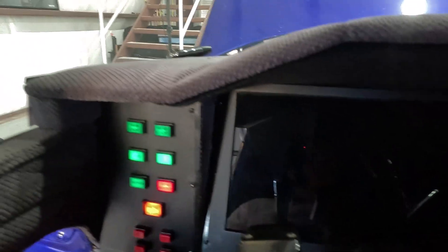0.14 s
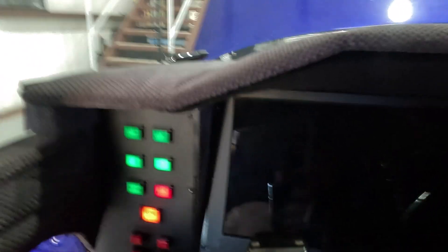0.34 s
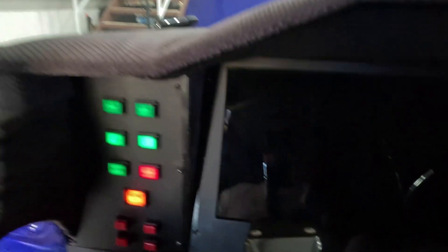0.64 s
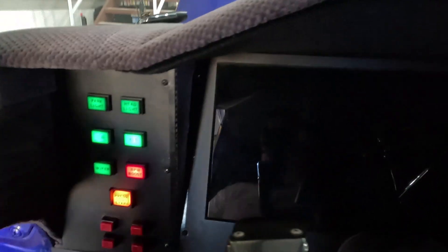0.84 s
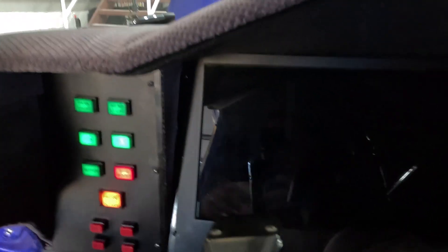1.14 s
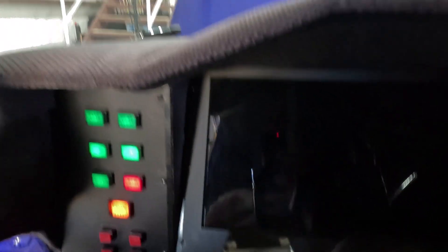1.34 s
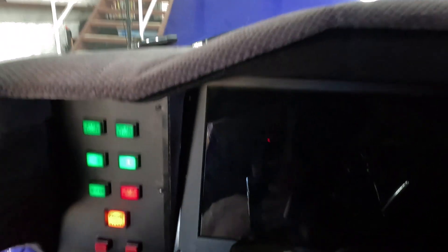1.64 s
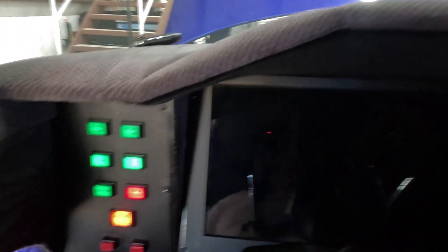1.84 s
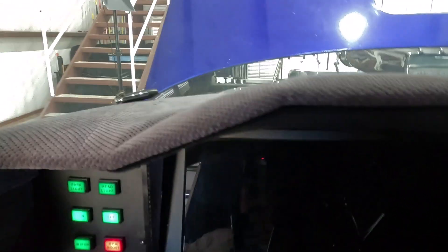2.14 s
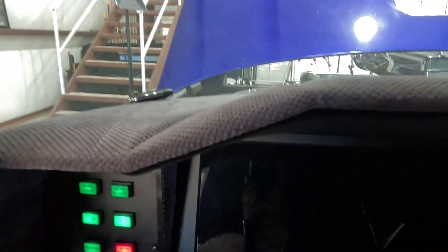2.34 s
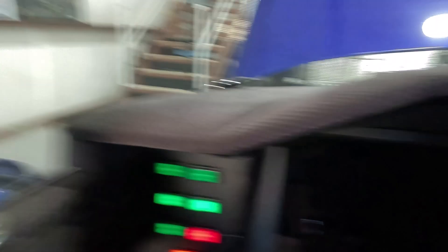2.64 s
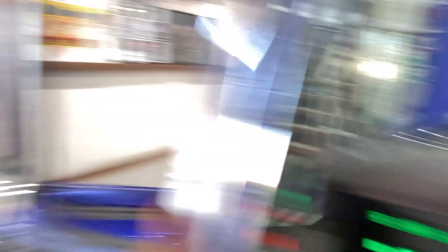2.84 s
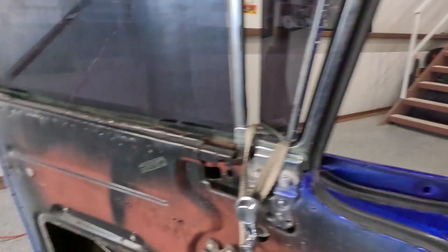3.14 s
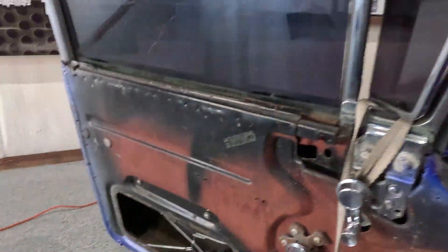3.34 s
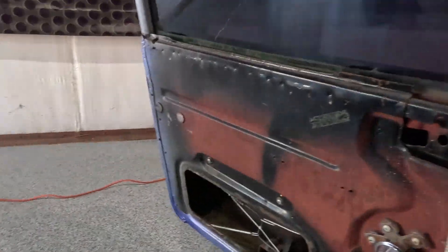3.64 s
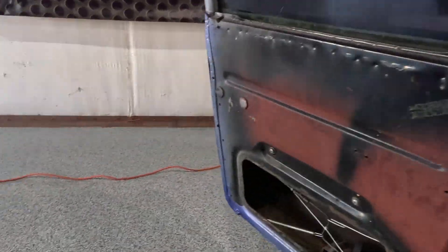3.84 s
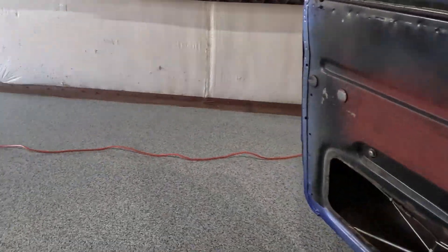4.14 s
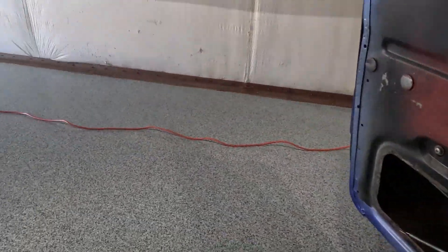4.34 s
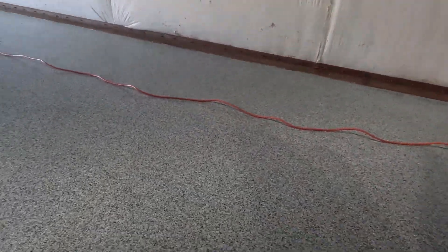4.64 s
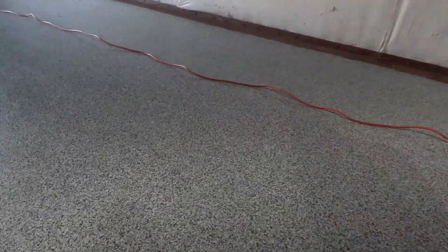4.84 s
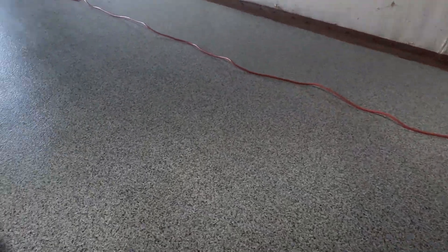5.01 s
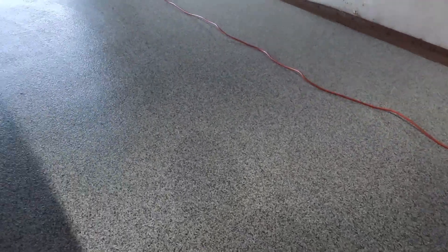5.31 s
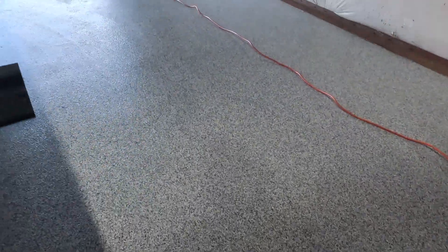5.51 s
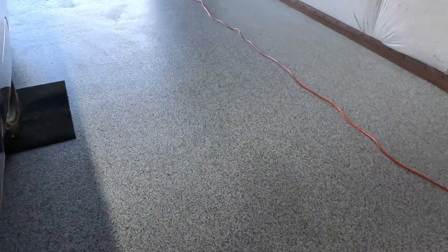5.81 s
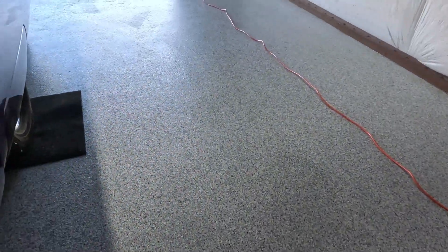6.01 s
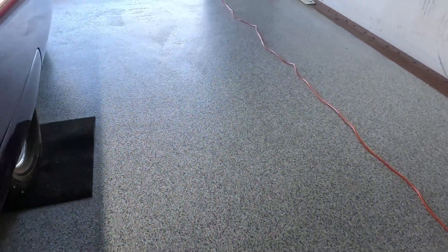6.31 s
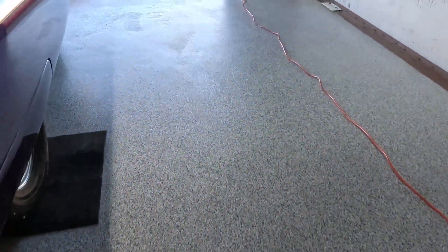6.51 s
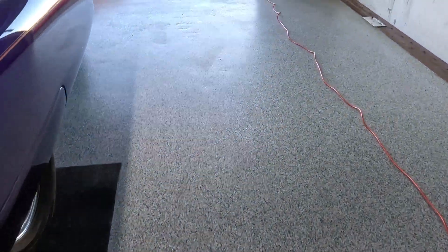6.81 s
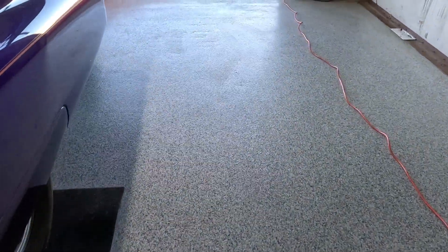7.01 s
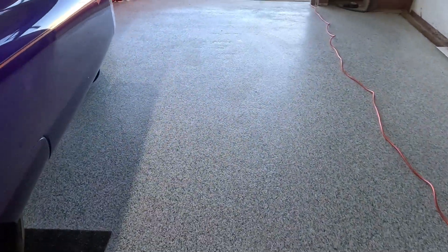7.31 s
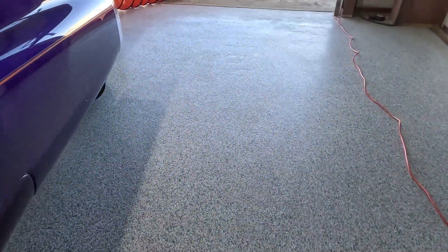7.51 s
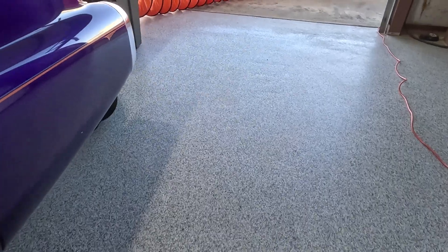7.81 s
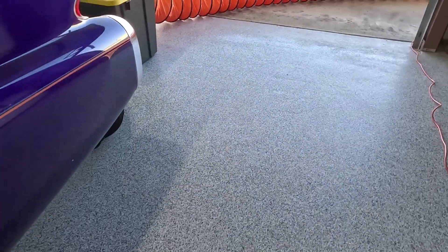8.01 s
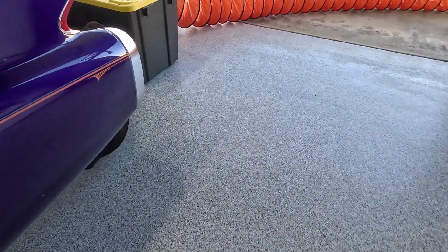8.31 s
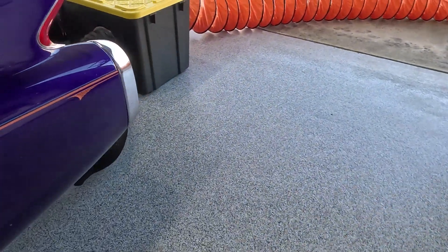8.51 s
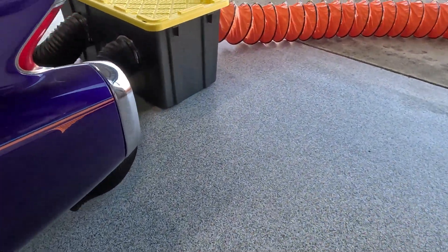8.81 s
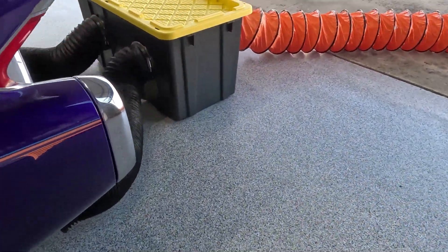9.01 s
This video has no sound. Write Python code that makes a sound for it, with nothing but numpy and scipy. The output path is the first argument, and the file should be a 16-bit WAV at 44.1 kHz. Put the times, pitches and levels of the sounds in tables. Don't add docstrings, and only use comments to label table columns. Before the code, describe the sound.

A stereo microphone sits inside an old car whose eight-cylinder engine idles in a hard-floored shop: low humming exhaust, soft rumble, muted engine hiss to the left. Near three seconds it leaves past the door; hiss and fine valve ticking brighten. Walking along the flank, the drone dips and swells in standing waves, then becomes fuller and more tonal at the tail.

```python
import sys
import numpy as np
from scipy import signal
from scipy.io import wavfile
from scipy.ndimage import uniform_filter1d

SR = 44100
rng = np.random.default_rng(int(sys.argv[2]) if len(sys.argv) > 2 else 0)


def persist_wave(psi):
    counts = np.round(np.clip(psi, -1, 1) * 32767).astype(np.int16)
    wavfile.write(sys.argv[1], SR, np.atleast_2d(counts).T)


def gain_from_db(level_db):
    decades = np.asarray(level_db, float) / 20
    return 10 ** decades


N = 403515
TIME = np.arange(N) / SR

# time_s, four_stroke_cycle_hz
ENGINE_SPEED = [(0.0, 8.427), (0.93, 8.425), (1.61, 8.547), (2.03, 8.464), (3.0, 8.635), (3.34, 8.493),
                (4.33, 8.614), (4.57, 8.488), (4.77, 8.544), (5.4, 8.567), (5.67, 8.486), (5.89, 8.565),
                (6.62, 8.509), (7.48, 8.287), (7.73, 8.236), (8.43, 8.2), (9.15, 8.221)]
# strength_db, lag_in_pipes_crank_degrees
FIRINGS = [(8.9, 44.0), (-10.1, 84.5), (8.8, 39.8), (9.1, 124.1), (8.0, 117.8), (7.7, 51.2), (-2.4, 70.8),
           (11.3, 76.7)]
# time_s, near_gain, near_delay_ms, far_gain, far_delay_ms
WALL_ECHOES = [
    (2.6, 1.0, 9.87, 1.01, 19.73),
    (3.2, 1.08, 9.96, 0.92, 19.82),
    (5.0, 0.96, 10.05, 0.83, 19.88),
    (6.0, 0.78, 10.55, 0.23, 20.35),
    (6.8, 0.73, 11.46, 0.24, 17.28),
    (7.3, 1.1, 12.11, 0.87, 16.98),
    (8.1, 1.0, 12.81, 0.75, 17.75),
    (8.4, 0.99, 12.71, 0.27, 16.78),
    (9.0, 0.96, 12.66, 0.0, 23.26),
]
# time_s, place (0 seat, 1 door, 2 flank, 3 tail)
PLACES = [
    (2.75, 0),
    (3.15, 1),
    (4.4, 0.87),
    (5.4, 2.13),
    (6.3, 2),
    (7.1, 2.5),
    (7.6, 2.5),
    (8.3, 3),
]
# frequency_hz, density_db_per_hz
HISS_IN_SEAT = [(350, -31), (600, -5), (810, -14.5), (1030, -6), (1400, -11), (1760, -13), (2130, -13),
                (4150, -17), (4440, -17.5), (7660, -24), (9500, -30), (10900, -38.5), (12300, -34),
                (15600, -49)]
# frequency_hz, density_db_per_hz
HISS_OUTSIDE = [(350, -28.5), (600, -2), (720, -5.5), (867, -7), (1180, -6), (1670, -10), (1780, -12.5),
                (1940, -10), (2250, -11.5), (2540, -11), (6000, -16.5), (8900, -24), (12300, -37.5),
                (15600, -50.5)]
# frequency_hz, density_db_per_hz
BARK_SPECTRUM = [(200, -40), (280, -7.5), (320, -6), (420, -4), (470, -7), (510, -2.5), (545, -12),
                 (600, -11.5), (625, -8.5), (650, -15.5), (900, -23.5), (1200, -50.5), (2000, -100)]
# frequency_hz, density_db_per_hz
RUMBLE_SPECTRUM = [(15, -22.5), (28, -10), (55, -6.5), (100, -2.5), (128, -4.5), (155, -13.5), (220, -14.5),
                   (280, -16.5), (340, -39)]
# time_s, level_db
RUMBLE_LEVEL = [(0, -39), (2.7, -38), (3.5, -41), (6, -42), (9.15, -41.5)]
# pitch_hz, width_hz, level_db
RINGING_PANELS = [(1007, 44, 8.5), (927, 37, 3.5), (1638, 67, 5), (1870, 50, 2.5), (2080, 43, 3.5),
                  (2195, 23, 3.5), (2590, 60, 3.5), (3480, 50, 3), (4030, 40, 4.5), (4200, 60, 3.5),
                  (7500, 300, 3), (5790, 25, 6), (8750, 88, 3.5)]
# frequency_hz, correlation (0 to 1)
SIDE_LIKENESS = [(60, 1.0), (130, 0.95), (290, 0.97), (640, 0.89), (1410, 0.74), (3100, 0.52), (6820, 0.58),
                 (15000, 0.38)]
# multiple_of_cycle, seat_db, door_db, flank_db, tail_db (rms)
UPPER_TONES = [(33.05, -55, -59.5, -57.5, -56.5), (34, -63, -62, -67.5, -45.5),
               (35.2, -61, -57, -57, -58.5), (36.1, -77.5, -54.5, -66, -50.5),
               (38.06, -72.5, -58.5, -60, -60.5), (38.46, -69.5, -71, -61.5, -60.5),
               (39.86, -70.5, -66, -66, -54.5), (42.4, -70.5, -69.5, -54, -73.5),
               (42.94, -76.5, -81, -60, -58.5), (44, -61.5, -61, -57, -62.5), (45.8, -66.5, -64, -62, -61),
               (46.8, -72, -71.5, -66.5, -56), (49.9, -77.5, -70, -79.5, -58.5),
               (51.14, -61, -62, -65, -62), (52.4, -73, -74.5, -72.5, -57),
               (59.96, -79.5, -61.5, -63.5, -72.5), (63.15, -80.5, -75.5, -80, -58),
               (64.14, -75, -74, -73, -63), (49, -69, -69.5, -67, -63), (59, -70, -77.5, -78, -66),
               (65, -85, -82, -68, -67.5), (66.03, -77, -69, -70, -74.5)]
# pitch_hz, level_db, t60_s
STRUCK_CASTINGS = [(1035, -5, .07), (1899, -6, 0.042), (2158, -8.5, 0.039), (2920, -8.5, .04),
                   (3230, -9.5, 0.036), (3460, -8, .04), (4020, -7.5, 0.061), (4730, -9.5, .04),
                   (5290, -8, 0.046), (5800, -9, .04), (6050, -9, 0.033), (7360, -11.5, 0.035),
                   (7800, -14, .03), (8650, -15.5, 0.027), (9500, -15, 0.028), (11200, -24.5, .015),
                   (13200, -30, .012)]
# multiple_of_cycle, crest_db, tilt_db_per_m, node_m, node_spacing_m
STANDING_TONES = [(3, -52.5, 3, 0.5, 2.09), (4, -33, 2, -0.34, 7.0), (5, -51.5, 2, 2, 3.98),
                  (6, -51.5, 0, 1.5, 1.59), (7, -51.5, 4, 1.7, 1.2), (8, -22, -3.5, 2, 2.08),
                  (9, -36, 3.5, 0.76, 6.91), (10, -46.5, 5.5, 1.4, 5.5), (11, -30, 3, 4, 3.6),
                  (12, -41, -2.5, 0.62, 2.07), (13, -16.5, -3, 0.11, 2.74),
                  (14, -37.5, -2.6, 0.1, 2.75), (15, -27.5, 1.95, 1.03, 1.36),
                  (16, -41, 3.94, 4.5, 7.0), (17, -49, 2.5, 0.5, 2.0),
                  (18, -42.5, -1, 2.76, 2.2), (19, -42.5, 1.76, 2.06, 3.7),
                       (20, -37, -1.3, 2.03, 1.12), (21, -52, 5, 0.94, 1.55), (22, -55.5, 4, 2.84, 2.1),
                       (23, -46, 1.6, 0.15, 7.0), (24, -53, 4.0, 0.84, 1.27), (25, -47, 1, 0.14, 2.09),
                       (26, -42.54, -2.52, 1.95, 1.8), (27, -58.41, 8.0, 1.42, 2.27),
                       (28, -38, -1.55, 1.38, 2.58), (29, -53, 4.5, 1.31, 3.7),
                       (30, -53.5, 4.45, 4.34, 3.09), (31, -58.6, 8.0, 2.01, 1.07),
                       (32, -45.91, 0.5, 1.54, 0.88)]
SEAT_TONES_DB = [-42, -32, -48.3, -47.5, -48.5, -33.5, -43.0, -49.5, -31, -31.5, -21.6, -41, -29.5, -39,
                 -47.5, -52.5, -44, -38, -57, -59.5, -47, -52.5, -57.5, -63.6, -60.5, -43, -52.5, -55,
                 -52.2, -46]
BARK_BY_PLACE = [
    -49.5,
    -47,
    -45.5,
    -44.5,
]
# time_s, level_db
WHINE_LEVEL = [
    (0, -91.5),
    (2, -88.5),
    (6.5, -91),
    (7.2, -100),
]

LEAVE_S, WALK_M_PER_S = 2.75, 0.4485
RETURN, RETURN_PER_M = 0.25, 0.13
BAY_SEAT_DB, BAY_DOOR_DB, BAY_DB_PER_M, BAY_GAP_DB, BAY_GAP_M = -58, -52.5, -0.59, 2.5, 0.2
BAY_SHADE_DB, BAY_SHADE_M, BAY_SHADE_WIDTH_M = -2.0, 1.6, 0.22
PAN_SEAT_DB, PAN_DOOR_DB, PAN_TAIL_DB, TURN_M = 4.5, -0.6, 3, 1.3
BARK_SHADE_DB, BARK_SHADE_M, BARK_SHADE_WIDTH_M = -4, 1.85, 0.44
WHINE_HZ = 11880


def evened(x):
    return x / np.sqrt(np.mean(x ** 2) + 1e-20)


def read(points, hz):
    f, value = np.transpose(points)
    return np.interp(np.log(hz + 1), np.log(f + 1), value)


def curve(rows, t, column=1):
    return np.interp(t, np.array(rows)[:, 0], np.array(rows)[:, column])


def drift(t, rate_hz):
    steps = rng.standard_normal(256)
    return np.interp(t * rate_hz, np.arange(len(steps)), steps) * 1.22


def cycles():
    return np.cumsum(curve(ENGINE_SPEED, TIME)) / SR


def metres(t):
    return WALK_M_PER_S * np.maximum(t - LEAVE_S, 0)


def outside(t):
    return np.clip(curve(PLACES, t), 0, 1)


def by_place(levels_db, t):
    return np.interp(curve(PLACES, t), np.arange(len(levels_db)), levels_db)


def noise(magnitude_db, size, patchy_db, top_hz):
    hop = size // 4
    t = np.arange(N // hop + 5) * hop / SR
    hz = np.fft.rfftfreq(size, 1 / SR)
    above = np.sum(hz > top_hz)
    hz = hz[hz <= top_hz]
    a, b, c, d, patches = rng.standard_normal((len(t), len(hz), 5)).T
    patches = uniform_filter1d(patches, size=6, axis=0)
    patches = evened(uniform_filter1d(patches, size=12, axis=1))
    same = np.clip(read(SIDE_LIKENESS, hz), -1, 1)[:, None]
    left = a + 1j * b
    right = same * left + np.sqrt(1 - same ** 2) * (c + 1j * d)
    z = np.array([left, right]) * gain_from_db(magnitude_db(hz, t) + patchy_db * patches)
    z = np.pad(z, ((0, 0), (0, above), (0, 0)))
    return signal.istft(z, nperseg=size, noverlap=size - hop)[1][:, :N]


def whine():
    waver = 2.5 * drift(TIME, 20.1)
    level_db = curve(WHINE_LEVEL, TIME) + 4.0 * drift(TIME, 15.0)
    return gain_from_db(level_db) * np.sin(2 * np.pi * WHINE_HZ * TIME + waver)


def valves():
    turns, t, out = cycles(), np.arange(3000) / SR, np.zeros((2, N))
    for hz, db, t60 in STRUCK_CASTINGS:
        angles = rng.random(4)
        slack, luck = rng.standard_normal((2, 78, 4))
        tap_turns = np.arange(len(luck))[:, None] + angles + 0.006 * slack
        taps = np.zeros(N + 1)
        taps[np.searchsorted(turns, tap_turns)] = gain_from_db(2.7 * luck)
        onset = np.minimum(t / 0.003, 1)
        ring = gain_from_db(db - 60 * t / t60) * onset * np.sin(2 * np.pi * hz * t)
        side = 0.47 * rng.uniform(-1.1, 1)
        out += np.outer([1 + side, 1 - side], signal.oaconvolve(taps[:N], ring)[:N])
    return evened(out)


def bay_hiss():
    def colour(hz, t):
        out = outside(t)
        ring_db = sum(db / (1 + (2 * (hz - f) / w) ** 2) for f, w, db in RINGING_PANELS)
        inside_db = read(HISS_IN_SEAT, hz) + ring_db
        outside_db = read(HISS_OUTSIDE, hz) + 0.8 * ring_db
        return np.outer(inside_db, 1 - out) + np.outer(outside_db, out)
    hiss = noise(colour, size=2048, patchy_db=1.1, top_hz=SR / 2)
    hiss = hiss / np.sqrt(uniform_filter1d((hiss ** 2).mean(0), size=16000))
    return hiss * (1 + 0.054 * np.cos(2 * np.pi * (cycles() - 0.45)))


def bay():
    out, way = outside(TIME), metres(TIME)
    open_db = BAY_DOOR_DB + BAY_DB_PER_M * way + BAY_GAP_DB * np.exp(-(way / BAY_GAP_M) ** 2 / 2)
    open_db = open_db + BAY_SHADE_DB / (1 + np.exp((BAY_SHADE_M - way) / BAY_SHADE_WIDTH_M))
    turned_db = PAN_TAIL_DB + (PAN_DOOR_DB - PAN_TAIL_DB) * np.exp(-way / TURN_M)
    level_db = BAY_SEAT_DB + out * (open_db - BAY_SEAT_DB)
    pan_db = PAN_SEAT_DB + out * (turned_db - PAN_SEAT_DB)
    both = bay_hiss() + gain_from_db(-14.5 + 2.1 * out) * valves()
    return both * gain_from_db(level_db + 3.5 + np.outer([0.5, -0.5], pan_db))


def rumble():
    low = noise(lambda hz, t: read(RUMBLE_SPECTRUM, hz)[:, None], size=4096, patchy_db=-0.5, top_hz=400.1)
    return gain_from_db(curve(RUMBLE_LEVEL, TIME)) * evened(low)


def bark():
    rush = noise(lambda hz, t: read(BARK_SPECTRUM, hz)[:, None], size=4096, patchy_db=1.0, top_hz=1999.5)
    near_tail = np.clip(curve(PLACES, TIME) - 1.5, 0, 1)
    shade_db = BARK_SHADE_DB * np.exp(-((metres(TIME) - BARK_SHADE_M) / BARK_SHADE_WIDTH_M) ** 2)
    level_db = by_place(BARK_BY_PLACE, TIME) + shade_db - 2.5 - 2.4 * near_tail
    pulse = 1 + 0.35 * near_tail * np.cos(4 * np.pi * (cycles() - 0.15))
    return gain_from_db(level_db) * evened(rush) * pulse


def standing(t):
    way, levels = metres(t), {}
    back = np.clip(RETURN + RETURN_PER_M * way, 0, 1)
    tones = STANDING_TONES
    for (k, crest_db, tilt_db, node, spacing), seat_db in zip(tones, SEAT_TONES_DB):
        beat = abs(1 - back * np.exp(2j * np.pi * (way - node) / spacing)) / (1 + back)
        shop_db = crest_db + tilt_db * way + 20 * np.log10(beat)
        levels[round(k)] = seat_db + outside(t) * (shop_db - seat_db)
    return levels


def exhaust():
    coarse = 32
    t, turns = TIME[::coarse], cycles()[::coarse]
    strength_db, lag = np.transpose(FIRINGS)
    firing_turn = np.arange(len(lag)) / len(lag) + lag / 720
    near, near_ms, far, far_ms = (curve(WALL_ECHOES, t, column=c + 1) for c in range(4))
    near_turn, far_turn = -2j * np.pi * 8.45 * np.array([near_ms, far_ms]) / 1000
    levels = {round(k): by_place(db, t) for k, *db in UPPER_TONES}
    out = np.zeros((2, len(t)))
    for k, level_db in (levels | standing(t)).items():
        beat = np.sum(gain_from_db(strength_db) * np.exp(-2j * np.pi * k * firing_turn))
        echo = 1 + near * np.exp(k * near_turn) + far * np.exp(k * far_turn)
        waver = 0.0056 * k * drift(t, 6.0) + np.outer([1, -1], 0.00009 * k ** 2 * drift(t, 1.5))
        angle = 2 * np.pi * k * turns + np.angle(beat * echo) + waver
        out += np.sqrt(2) * gain_from_db(level_db + 0.03 * k * drift(t, 5.0)) * np.cos(angle)
    padded = np.pad(out, ((0, 0), (32, 32)), "reflect", reflect_type="odd")
    return signal.resample_poly(padded, coarse, 1, axis=1)[:, 32 * coarse:][:, :N]


def scene():
    return whine() + bay() + rumble() + bark() + exhaust() * gain_from_db([[0.12], [-0.12]])


def top_cut(x):
    return signal.sosfilt(signal.butter(12, 15710, fs=SR, output="sos"), x)


def record(dry):
    ceiling = 0.65
    mix = 1.043 * ceiling * np.tanh(dry / ceiling)
    return top_cut(mix)


dry = scene()
out = record(dry)
persist_wave(out)
```